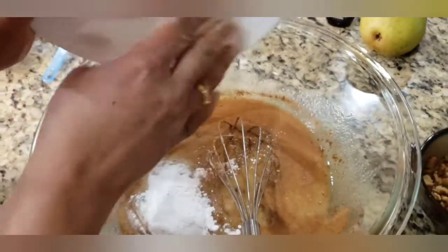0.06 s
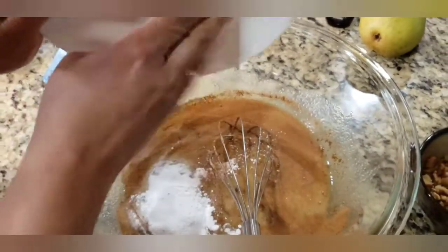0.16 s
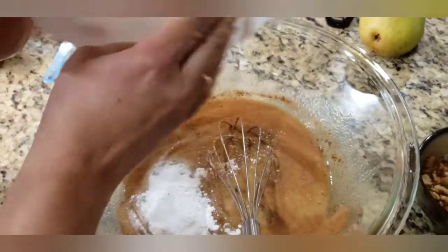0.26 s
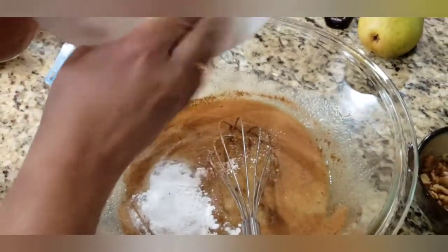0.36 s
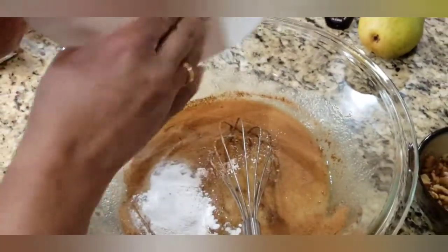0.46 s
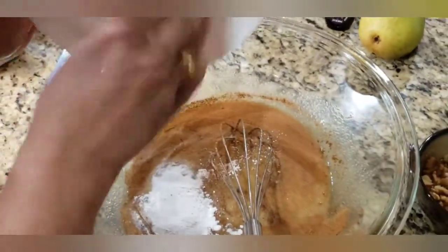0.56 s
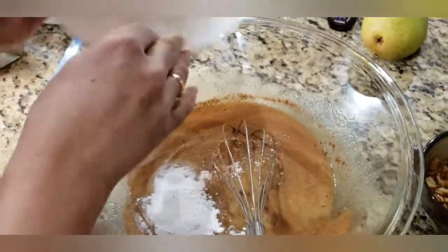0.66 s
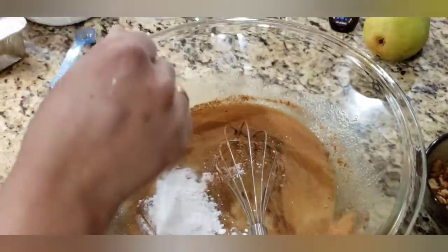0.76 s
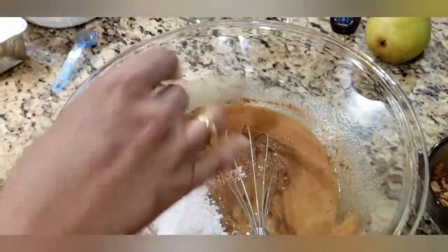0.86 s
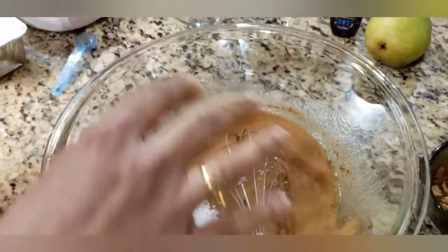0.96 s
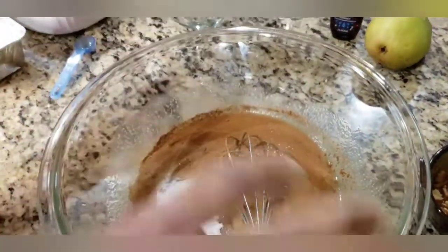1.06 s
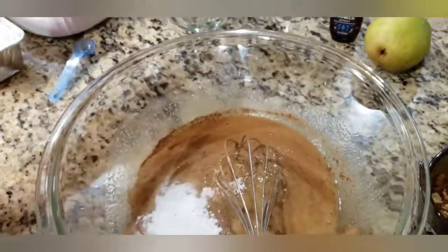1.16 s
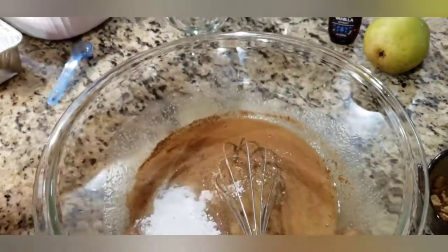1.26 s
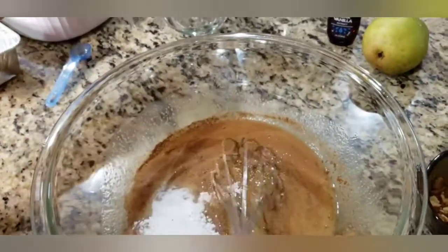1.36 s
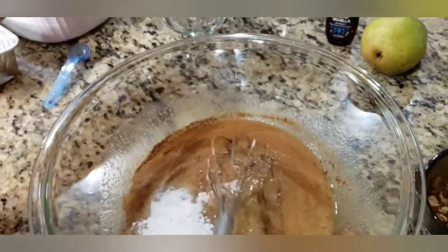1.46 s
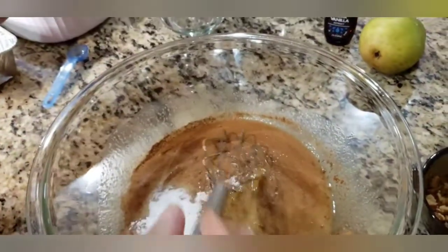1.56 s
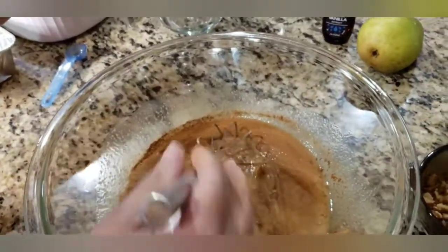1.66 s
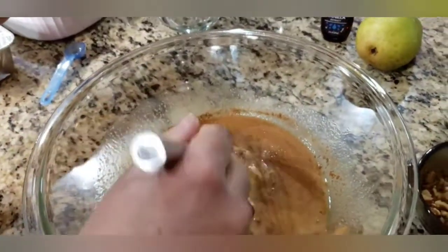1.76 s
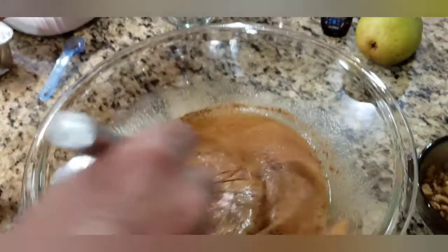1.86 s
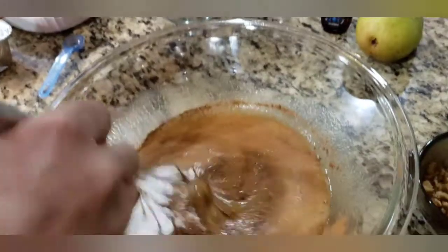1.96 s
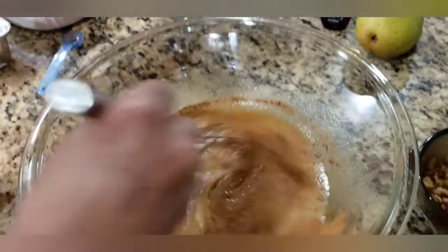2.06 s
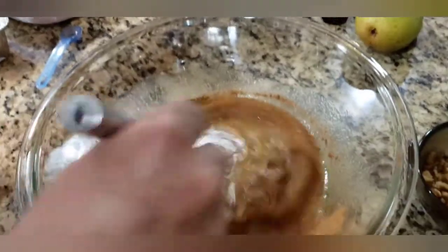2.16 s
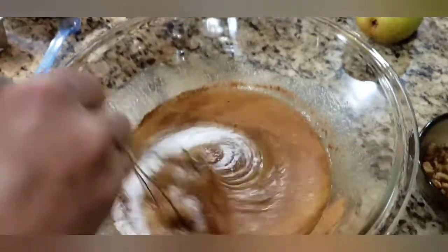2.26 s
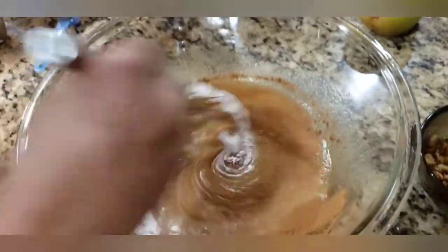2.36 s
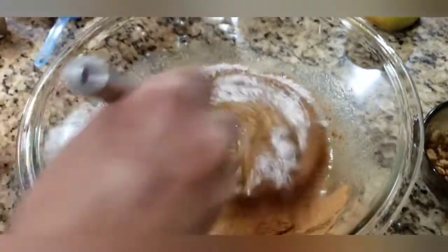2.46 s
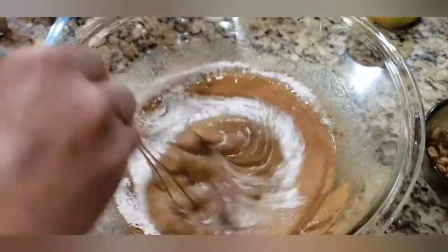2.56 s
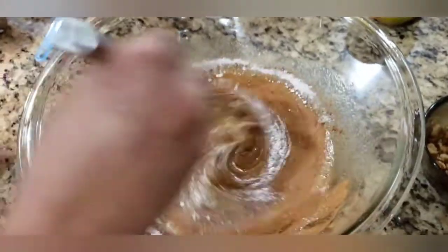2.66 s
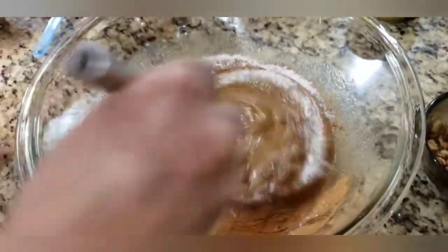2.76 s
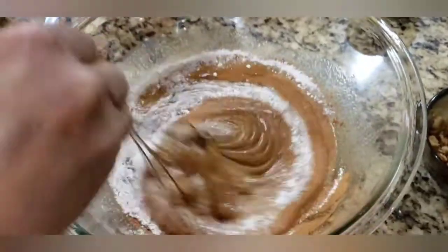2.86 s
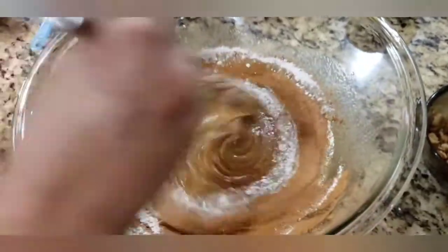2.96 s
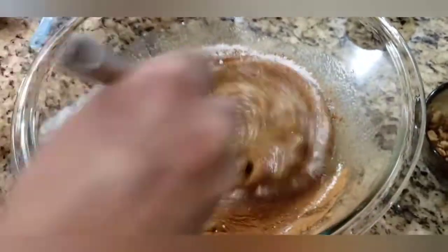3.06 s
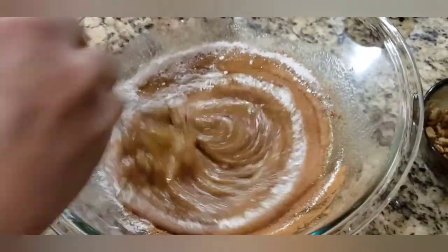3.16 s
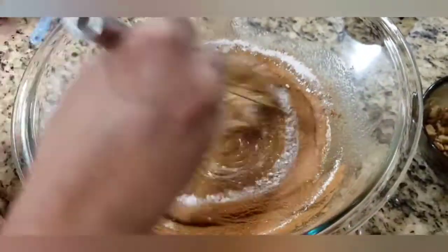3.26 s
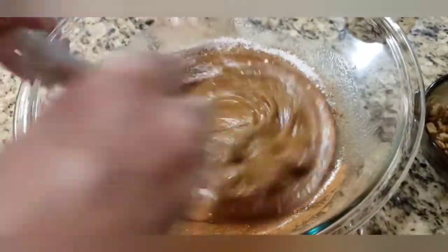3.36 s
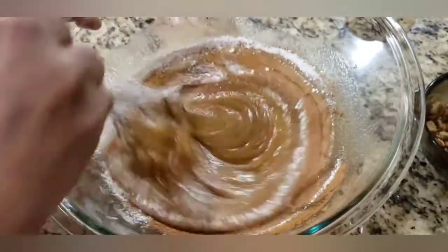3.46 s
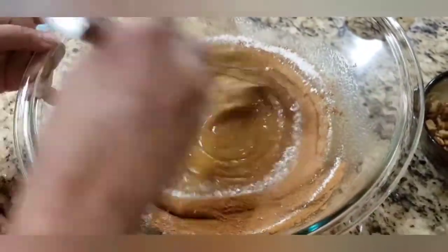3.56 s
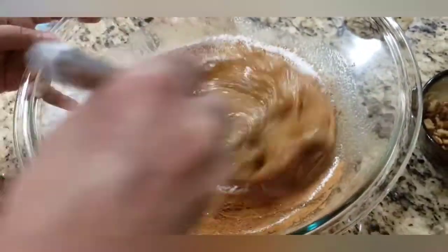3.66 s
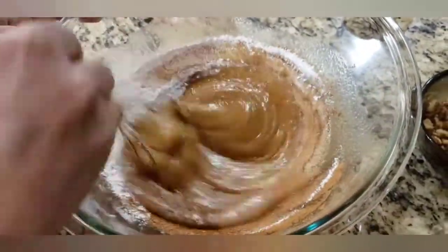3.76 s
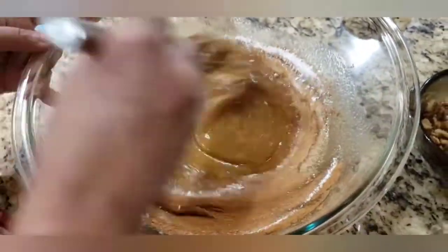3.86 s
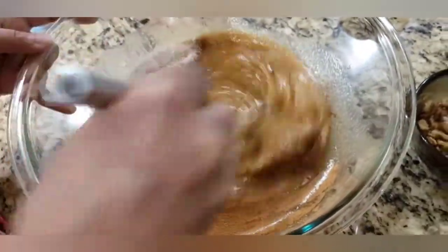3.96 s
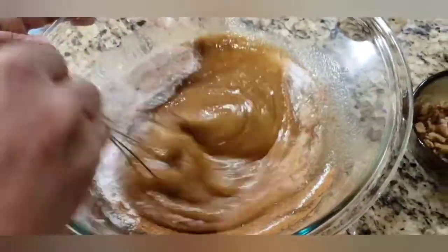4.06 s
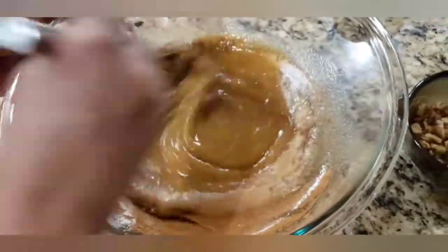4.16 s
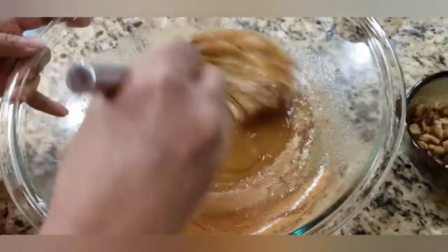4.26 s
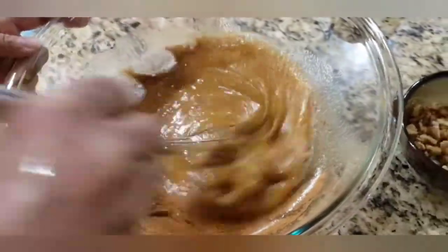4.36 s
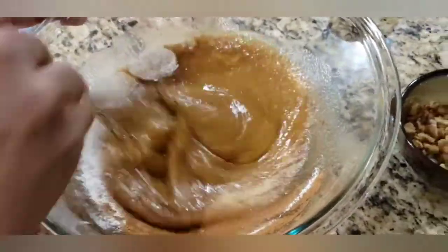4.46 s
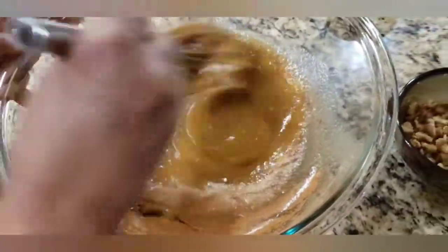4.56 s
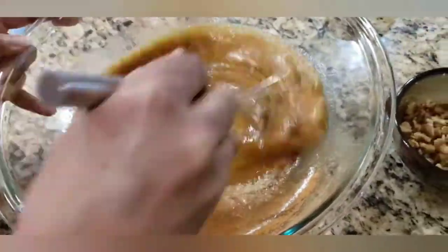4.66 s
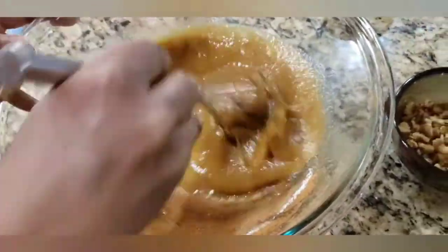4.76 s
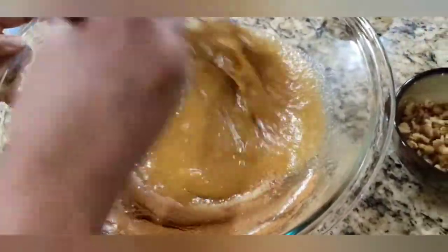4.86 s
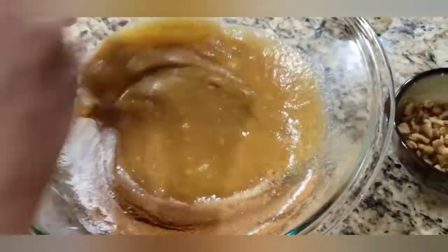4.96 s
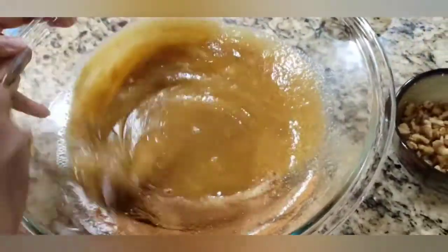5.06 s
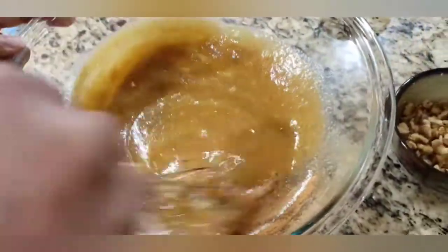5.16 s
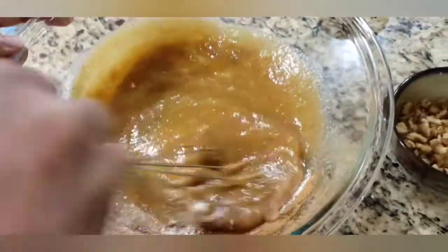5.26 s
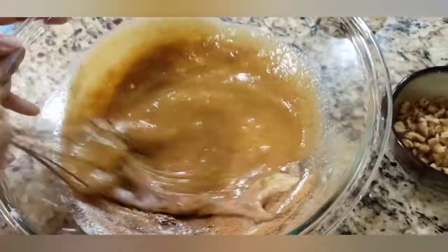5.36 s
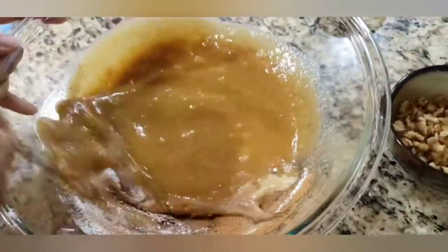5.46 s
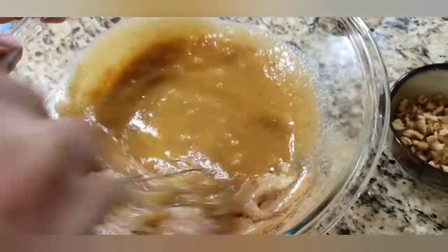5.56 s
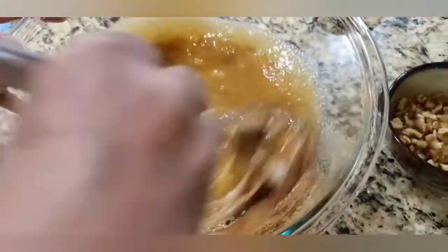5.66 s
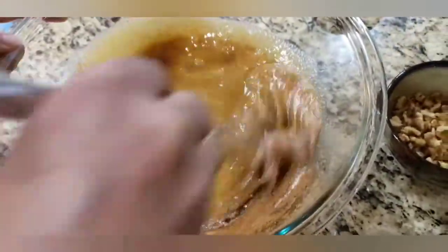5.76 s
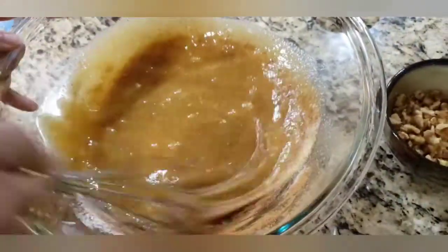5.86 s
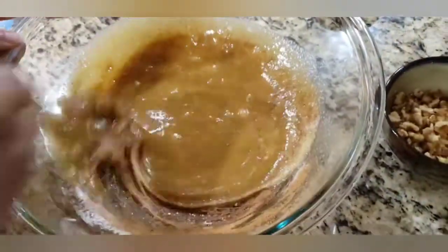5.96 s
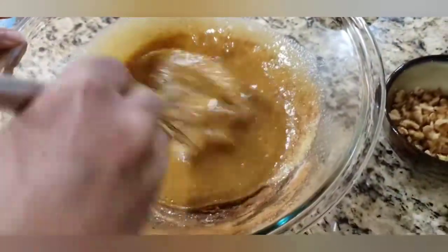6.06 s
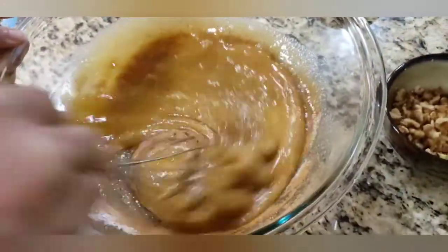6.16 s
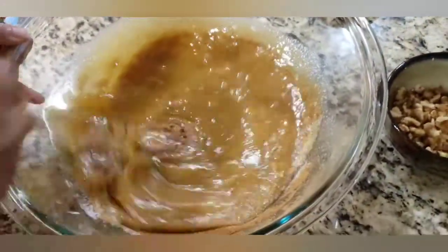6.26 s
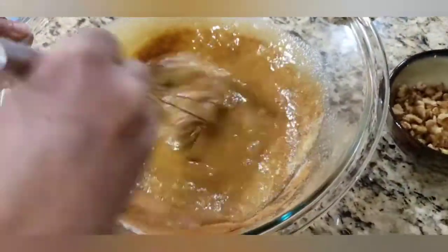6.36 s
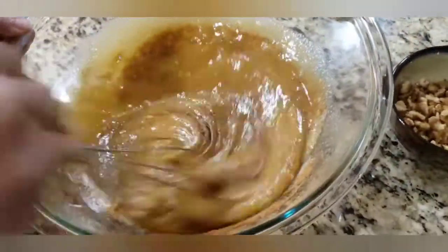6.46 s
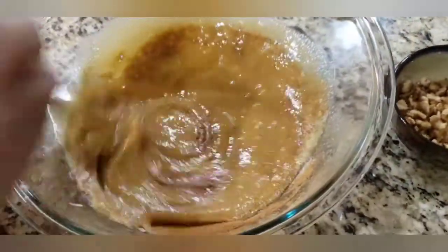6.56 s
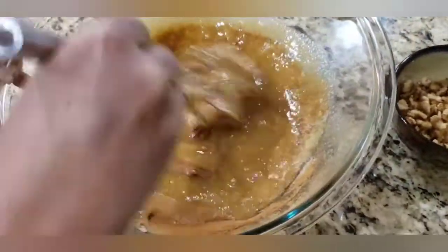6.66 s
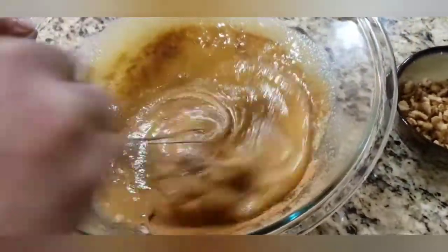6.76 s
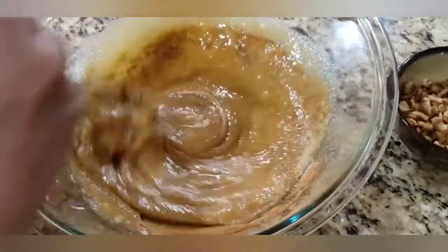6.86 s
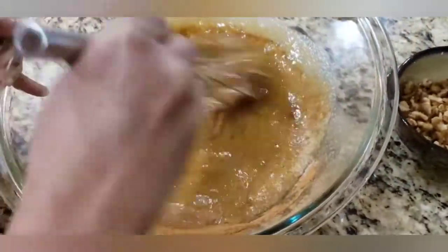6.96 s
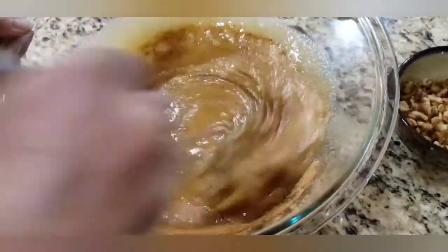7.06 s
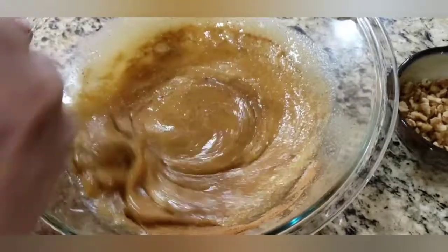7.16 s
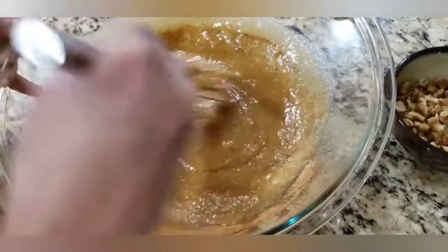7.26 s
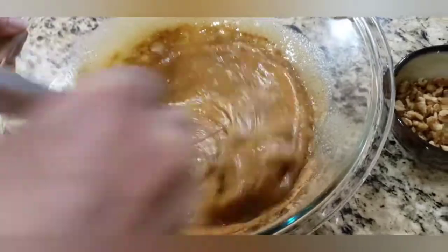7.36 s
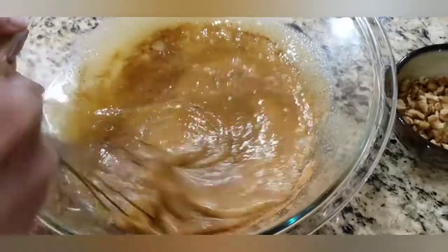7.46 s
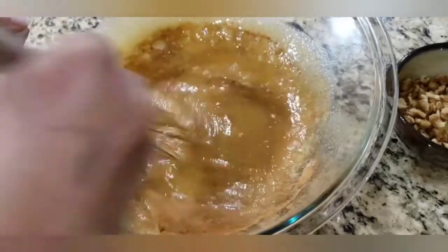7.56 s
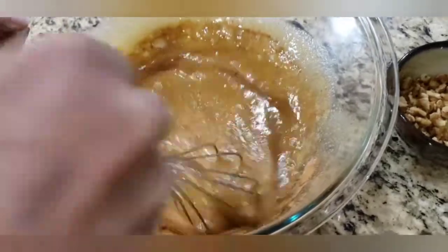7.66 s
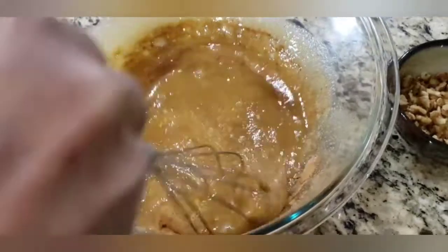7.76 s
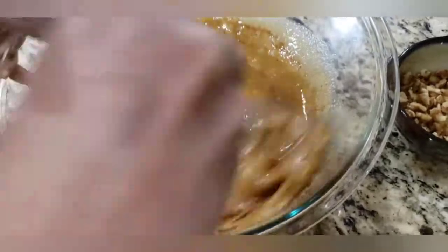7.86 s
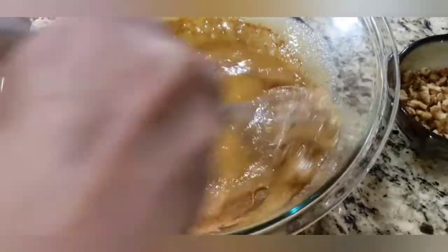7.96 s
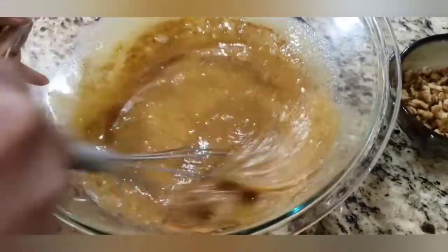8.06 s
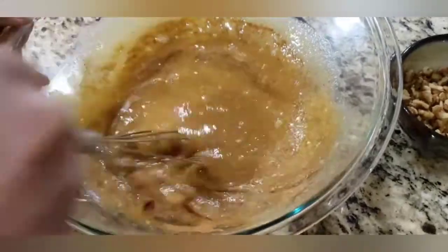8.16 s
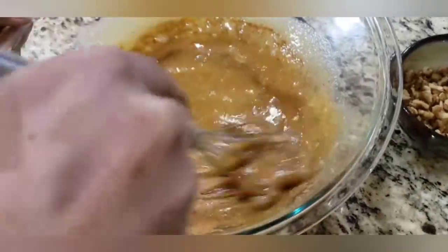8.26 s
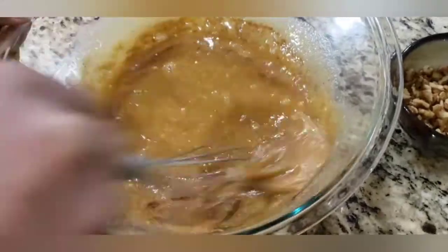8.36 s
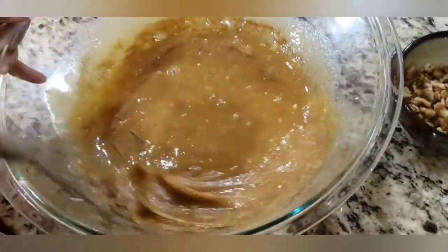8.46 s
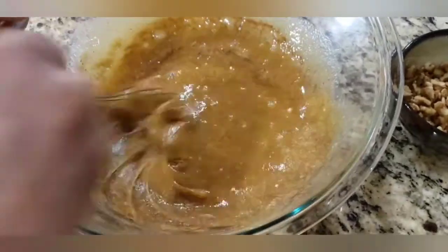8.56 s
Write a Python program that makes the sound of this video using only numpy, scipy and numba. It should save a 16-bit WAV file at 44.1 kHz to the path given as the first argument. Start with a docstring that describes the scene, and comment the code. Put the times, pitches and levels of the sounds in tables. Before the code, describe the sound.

A close stereo pickup in a small kitchen, with short reflections and a faint low appliance hum. From 0 to 0.9 s a small ceramic dish is tapped empty in light, dry knocks, strongest near 0.25, 0.46 and 0.66, with thin finger brushing. A quiet gap follows until about 1.6 s. At 1.73 the dish lands on stone with the loudest, bright clack and a glass jar's chime; more clatter comes at 2.0 to 2.2, with another jar ringing at 2.1. From about 2.3 a wire whisk beats thick batter in a glass bowl: rapid uneven ticks, sizzling scratches, wet gurgles and smacks. It is hardest and busiest around 3.9 to 4.6, with a dull bowl bump near 5.2 and a slightly sparser moment around 5.5. Strokes pick up again from 5.7, with a sharp clink at 7.0, then soften somewhat but continue scraping to the end at 8.6.

```python
"""A wire whisk beats thick batter in a glass bowl: noise bursts through resonances tick and sizzle as wire
on glass, chirped damped tones smack as batter, and filtered noise makes the bowl rumble and drag on stone.
Before that a small ceramic dish, a sum of decaying modes, is tapped empty over the bowl and set down on the
stone counter, where two glass jars chime in. Two ports of a phone close above hear it in a small kitchen
with a low appliance hum of shaped noise."""
import sys
import numpy as np
from scipy import signal
from scipy.fft import rfft, irfft
from scipy.io import wavfile
from scipy.ndimage import uniform_filter1d, map_coordinates
from numba import njit

SR = 44100
rng = np.random.default_rng(int(sys.argv[2]) if len(sys.argv) > 2 else 0)


def gain_from_db(level_db):
    """Convert decibel levels to linear amplitude factors (20 dB per decade)."""
    decades = np.asarray(level_db, float) / 20
    return 10 ** decades


def put_to_file(sound):
    """Save the sound as 16-bit audio at rate SR, in the file named by the first command-line argument."""
    columns = np.atleast_2d(sound).T  # one column per channel
    safe = np.clip(columns, -1, 1)
    whole_steps = np.round(safe * 32767)
    wavfile.write(sys.argv[1], SR, whole_steps.astype(np.int16))


N = 379701  # samples


def over_hz(table, size):
    """Spectral envelope: a table read at each transform bin, linear in log frequency."""
    hz, value = np.transpose(table)
    return np.interp(np.log(np.fft.rfftfreq(size, 1 / SR) + 1), np.log(hz), value)


def over_time(table):
    """Temporal envelope: each column of a table interpolated at every sample."""
    s, *columns = np.transpose(table)
    return [np.interp(np.arange(N) / SR, s, column) for column in columns]


def shaped(x, gain):
    """Linear filtering in the frequency domain: one gain per bin."""
    return irfft(rfft(x) * gain, N)


def unit(x):
    """Power normalisation: scale to rms 1."""
    return x / np.sqrt(np.mean(x ** 2))


def walk(rate):
    """Slow random modulation: levels held for 1 / rate s, smoothed twice, rms 1."""
    hold = int(SR / rate)
    steps = np.repeat(rng.standard_normal(N // hold + 1), hold)
    return unit(uniform_filter1d(uniform_filter1d(steps, hold), hold)[:N])


def grit(per_s, spread_db):
    """Shot noise: sparse random clicks, a few much larger than the rest, rms 1."""
    clicks = (rng.random(N) < per_s / SR) * rng.standard_normal(N)
    return unit(clicks * gain_from_db(spread_db * np.minimum(rng.exponential(size=N), 3.5)))


def impulses(s, db):
    """Ideal impact: one sample at each time."""
    out = np.zeros(N)
    out[(np.atleast_1d(s) * SR).astype(int)] = gain_from_db(db)
    return out


def resonance(x, hz, width_hz):
    """Damped oscillator: a two-pole resonance with gain 1 at the centre."""
    return signal.lfilter(*signal.iirpeak(hz, hz / width_hz, SR), x)


def ring(x, modes):
    """Modal superposition: a unit impulse starts each decaying mode at its own level."""
    out = np.zeros(N)
    for hz, db, t60 in modes:
        pole = np.exp((2j * np.pi * hz - np.log(1000) / t60) / SR)
        out += gain_from_db(db) * signal.lfilter([1], [1, -pole], x).imag
    return out


@njit
def sliding(x, hz, width_hz):
    """Time-varying oscillator: a resonance whose centre moves every sample, gain 1 at the centre."""
    y, band, low = np.empty(len(x)), 0., 0.
    for i in range(len(x)):
        g, damping = np.tan(np.pi * hz[i] / SR), width_hz / hz[i]
        v = (band + g * (x[i] + 1e-18 - low)) / (1 + g * (g + damping))
        band, low, y[i] = 2 * v - band, low + 2 * g * v, damping * v
    return y


def loose(x, hz, width_hz):
    """Load-dependent resonance: batter load and contact point shift its centre at random."""
    detune_share, detunes_per_s = .03, 18
    return sliding(x, hz * (1 + detune_share * walk(detunes_per_s)), 1. * width_hz)


def glide(x, share, rate):
    """Frequency modulation by playing x at a wandering speed: its resonances slide up and down."""
    return map_coordinates(x, [np.cumsum(1 + share * walk(rate))], order=1, mode="mirror")


def patchy(x, colour, rate):
    """Independent band modulation: overlapping bands of coloured x flicker apart."""
    flicker_db = 2
    octave = np.log2(np.fft.rfftfreq(N, 1 / SR) + 1)
    centres = np.log2([1500, 3000, 4500, 6500, 9000, 12000, 15500])
    gain = gain_from_db(over_hz(colour, N))
    return sum(shaped(x * gain_from_db(flicker_db * walk(rate)), np.interp(octave, centres, band) * gain)
               for band in np.eye(len(centres)))


def bursts(s, ms, gain, rise=0.057):
    """Rough contact: noise pressure peaks at s, builds faster than it fades; one gain row per output."""
    first_touch = 2
    out, t = np.zeros((len(gain), N + 4096)), (np.arange(4096) - 1024) / SR
    for k, noise in enumerate(rng.standard_normal((len(s), 4096))):
        noise[1024] = first_touch
        gritty = noise * np.sqrt(np.abs(noise))
        tau = np.where(t < 0, rise, .75) * max(ms[k], .2) / 1000
        at = int(s[k] * SR)
        out[:, at:at + len(t)] += gain[:, k, None] * gritty * np.exp(-np.abs(t) / tau)
    return out[:, 1024:N + 1024]


def pops(rows, decay_s, rise_s, glide, rough_db):
    """Transient oscillation: one damped, gliding tone per row (time [s], level [dB], frequency [Hz])."""
    out, t = np.zeros(N + 8192), np.arange(8192) / SR
    for (s, db, hz), tau in zip(rows, np.broadcast_to(decay_s, len(rows))):
        tone = np.sin(2 * np.pi * hz * t * (1 + glide * t)) * np.exp(-t / tau) * (1 - np.exp(-t / rise_s))
        out[int(s * SR):][:len(t)] += gain_from_db(db) * tone
    return out[:N] * gain_from_db(rough_db * walk(70))


def swell(s, db, rise_s, fade_s):
    """Exponential energy envelope: power builds up to each moment s and fades after it."""
    t = np.arange(-SR // 2, SR // 2 + 1) / SR
    shape = np.exp(-2 * np.abs(t) / np.where(t < 0, rise_s, fade_s))
    return np.abs(signal.fftconvolve(impulses(s, db) ** 2, shape, "same"))


# room tone spectrum, relative: (frequency [Hz], level [dB])
KITCHEN_SPECTRUM = [(18, -31), (30, -21), (59, 1.5), (95, -12.5), (131, 3.5), (170, -7.5), (266, -5.5),
                    (295, -4.5), (355, -12.5), (649, -28), (1430, -48), (1590, -50), (1720, -67),
                    (16000, -43)]
# its balance between the ports: (frequency [Hz], left minus right [dB])
KITCHEN_BALANCE = [(60, 2.5), (110, 1), (200, 3.5), (380, -1.5), (700, -6), (1290, 0), (2380, 11),
                   (4400, -57), (8120, 2), (15000, -26)]
# its likeness at the ports, clipped to 0-1 on use: (frequency [Hz], likeness [1])
KITCHEN_LIKENESS = [(60, 4), (130, 5), (290, -1), (640, 1), (15000, -7.5)]


def kitchen():
    """Diffuse-field noise: mid and side room tones whose ratio sets how alike the ports are."""
    level_db = -55
    alike = np.sqrt(np.clip(over_hz(KITCHEN_LIKENESS, N), 0, 1))
    colour = gain_from_db(over_hz(KITCHEN_SPECTRUM, N))
    mid, side = (shaped(rng.standard_normal(N) * gain_from_db(5.3 * walk(5.4)), colour * np.sqrt(1 + sign * alike))
                 for sign in (1, -1))
    half = gain_from_db(over_hz(KITCHEN_BALANCE, N) / 2)
    return gain_from_db(level_db) * unit(np.array([shaped(mid + side, half), shaped(mid - side, 1 / half)]))


def room(x, early_db, late_db):
    """Reverberation by convolution: close reflections from bowl and counter, then a duller tail."""
    early_t60_s, late_t60_s = 0.0091, 0.37
    alike_hz = 700  # below it both ports hear the same tail
    t = np.arange(SR // 2) / SR
    early, late = (rng.standard_normal((2, len(t))) * np.exp(-np.log(1000) * t / t60) * (t > .001)
                   for t60 in (early_t60_s, late_t60_s))
    late = signal.lfilter([1], [1, -.6], late)
    late = signal.lfilter(*signal.butter(1, 350, "high", fs=SR), late)  # the small kitchen holds little bass
    early = signal.lfilter(*signal.butter(2, alike_hz, "high", fs=SR), early)
    late = late - signal.lfilter(*signal.butter(1, alike_hz, fs=SR), late - late[0])
    shifting = x * np.tanh(3 * walk(25))  # moving hands keep changing the close paths
    out = 0
    for source, echo, db in ((shifting, early[:, :2048], early_db), (x, late, late_db)):
        echo = echo / np.linalg.norm(echo, axis=1, keepdims=True)
        out = out + gain_from_db(db) * signal.oaconvolve(source, echo, axes=1)[:, :N]
    return out


# balance between the two ports: (frequency [Hz], left minus right [dB])
PORT_BALANCE = [(60, -13.5), (110, -10), (200, -2.5), (380, 1.5), (700, -2.5), (1290, 2), (2380, 4),
                (4400, -8.5), (8120, -4.5), (15000, -7)]


def ports(x, moving):
    """Interaural-like differences: level and arrival differ; moving hands scatter treble between ports."""
    lag_ms, unlike_hz = 0.15, 1580  # the right port hears later; above unlike_hz the ports grow unlike
    hz = np.fft.rfftfreq(N, 1 / SR)
    turn = gain_from_db(over_hz(PORT_BALANCE, N) / 2) * np.exp(1j * np.pi * hz * lag_ms / 1000)
    treble = 0.93 * hz / np.hypot(hz, unlike_hz)
    delay = np.exp(-2j * np.pi * hz * 0.0004005)  # s
    own = shaped(x * np.tanh(2 * walk(moving)), treble * delay)
    return np.array([shaped(x + own, turn), shaped(x - own, 1 / turn)])


# blows on the dish, levels before each layer's trim:
# (time [s], ring level [dB], thud level [dB], clatter level [dB])
DISH_BLOWS = [(0.0586, -43, -50, -77), (0.2492, -37.5, -36, -55), (0.306, -47.5, -70, -78),
              (0.4606, -31.5, -34.5, -43.5), (0.4734, -36.5, -68, -65), (0.665, -56, -32, -52),
              (0.738, -50.5, -80, -84), (0.7962, -46, -61, -68), (0.861, -46, -53, -77),
              (1.726, -14.5, -42, -19), (1.979, -28.5, -55, -31.5), (2.0038, -40, -58, -27.5),
              (2.108, -19.5, -49, -19), (2.179, -23, -59, -27)]
# modes of the dish: (frequency [Hz], level [dB], t60 [s])
DISH_MODES = [(1608, -2, .07), (1627, -8, .1), (2807, -3, .13), (2828, 1, .07), (4380, 3.5, .035),
              (5440, -7, .04), (6680, -4, .04)]
# nudges, one for each of two glass jars: (time [s], level [dB])
JAR_NUDGES = [(1.725, -32.5), (2.108, -23.5)]
# modes of each jar, one list a jar: (frequency [Hz], level [dB], t60 [s])
JAR_MODES = [
    [(3256, -3, .32), (3602, -12, 1.1), (4436, -10, .3), (5158, 0, .21), (5297, -10, .25), (6365, -4, .25),
     (7257, -20, .3)],
    [(1405, -23, .35), (2847, -16, .3), (2913, -15, .55), (4415, -13, .3), (4468, -4, .15), (4570, -18, .4),
     (5050, -14, .12), (5470, -2, .16), (6700, -10, .06)],
]


def dish():
    """Modal vibration: each blow rings the dish over a one-swing thud and a clatter; the jars chime in."""
    s, ring_db, thud_db, clatter_db = np.transpose(DISH_BLOWS)
    rings = gain_from_db(1.24 * walk(50.65)) * ring(impulses(s, ring_db - 9.5), DISH_MODES)
    jars = sum(ring(impulses(*nudge), modes) for nudge, modes in zip(JAR_NUDGES, JAR_MODES))
    jars = gain_from_db(3.6 * walk(60.17)) * jars
    # a negative frequency starts the swing downwards
    thud = pops(np.c_[s - .002, thud_db + 19, np.full(len(s), -225.)], 0.0018, 0.0014, 0, 0)
    clatter = bursts(s + 0.00252, np.full(len(s), 5.), gain_from_db([clatter_db + 11.0]))[0]
    return rings + jars + thud + resonance(resonance(clatter, 700, 1630), 910, 1900)


# handling and stirring: (time [s], batter level [dB], bowl drag on stone [dB], rumble level [dB])
STIRRING = [(0.0, -77, -84, -57), (1.03, -71.5, -64.5, -69), (1.65, -89, -73, -54.5), (1.92, -54, -71, -60),
            (2.23, -52, -52.5, -65), (2.64, -64, -66, -55.5), (3.14, -70.5, -66, -65.5),
            (4.82, -59, -58, -50), (5.49, -66, -59, -57.5), (7.19, -62.5, -60, -59.5),
            (7.6, -70, -60.5, -60), (8.61, -61, -58.5, -64)]
# low knocks, the first a tap on the held dish, the rest dish and bowl on the stone:
# (time [s], level [dB], frequency [Hz], decay [s])
LOW_KNOCKS = [(0.663, -30, 974, 0.0024), (1.98, -26, 498.5, 0.049), (2.008, -26, 504, 0.026),
              (2.108, -11.5, 435, 0.0093), (2.179, -23, 419.3, 0.036), (2.235, -24, 422.3, 0.018),
              (2.264, -31.5, 401, 0.017), (2.431, -24.5, 370, 0.0036), (3.664, -37, 307, 0.023),
              (4.311, -37, 291, 0.027), (3.701, -46, 368, 0.02), (4.256, -43, 243, 0.011),
              (4.331, -41, 398, 0.015), (4.469, -40.5, 337, 0.015), (4.813, -41.5, 388, 0.038),
              (4.884, -36.5, 369, 0.026), (5.179, -17.5, 221, 0.0019), (5.762, -35.5, 341, 0.016),
              (5.944, -41, 328, 0.046), (5.272, -42.5, 483, 0.011), (6.396, -49, 296, 0.018),
              (6.744, -44.5, 396, 0.016), (6.805, -44.5, 285, 0.018), (6.883, -41, 524, 0.011),
              (7.004, -45, 368, 0.017), (7.083, -43, 467, 0.017), (7.261, -46, 397, 0.014),
              (7.413, -48, 305, 0.025), (7.537, -43, 415, 0.014), (8.087, -43.5, 338, 0.073),
              (8.491, -45.5, 367, 0.023)]
# bumps of the bowl on the counter: (time [s], level [dB], frequency [Hz])
BOWL_BUMPS = [(2.699, -40, 123), (4.844, -30, 57.6), (5.175, -32.5, 69), (5.211, -35, 85)]


def stir():
    """Friction and cavity resonance: batter gurgles in drifting pockets, the bowl drags, low knocks sound."""
    batter_db, drag_db, rumble_db = over_time(STIRRING)
    pockets = np.zeros(N)
    for hz in (640, 865, 1020, 1195):
        pocket = glide(resonance(grit(900, 1.0), hz, 110), .06, 8)  # share of pitch, turns per s
        pockets += gain_from_db(3 * walk(20)) * pocket
    drag = sum(gain_from_db(5.3 * walk(12)) * resonance(rng.standard_normal(N), hz, 51)
               for hz in (268, 333, 375.6, 469.0))
    rumble = sum(gain_from_db(3 * walk(12)) * resonance(rng.standard_normal(N), hz, width)
                 for hz, width in ((57, 21), (128, 29.6)))
    # each contact sets the batter moving; the dish skids on after each clatter
    s, tick_db, _, body_db = np.transpose(CONTACTS)
    slosh = swell(s, tick_db + body_db - 14, rise_s=0.0029, fade_s=0.023)
    skid = swell(*np.transpose(DISH_BLOWS)[[0, 3]], rise_s=0.003, fade_s=0.092)
    skid_db, skid_low_db = -20, -22  # relative to the clatter column, in the middle and the low band
    scuff = gain_from_db(skid_db) * np.sqrt(skid) * unit(resonance(grit(790, 1.28), 1220, 1500))
    middle = np.sqrt(gain_from_db(batter_db) ** 2 + slosh)
    low = np.sqrt(gain_from_db(drag_db) ** 2 + gain_from_db(3.0) ** 2 * slosh + gain_from_db(skid_low_db) ** 2 * skid)
    layers = scuff + middle * unit(pockets) + low * unit(drag) + gain_from_db(rumble_db) * unit(rumble)
    rows = np.array(LOW_KNOCKS)
    knocks = pops(rows[:, :3], rows[:, 3], 0.00091, -0.066, 0.96)
    return layers + knocks + pops(BOWL_BUMPS, 0.012, 0.00026, 0, 0)


# rubbing: (time [s], scratch level [dB])
RUBBING = [(0.0, -67.5), (0.53, -82), (0.72, -72), (0.96, -62), (1.29, -74), (1.6, -68), (1.89, -52),
           (2.18, -55.5), (2.85, -55), (3.04, -55), (3.38, -59), (4.12, -51), (5.04, -62.5), (5.56, -60),
           (5.99, -53.5), (6.47, -55), (6.81, -57.5), (7.24, -52), (7.77, -61.5), (8.61, -53.5)]
# spectrum of the scratch, relative: (frequency [Hz], level [dB])
SCRATCH_SPECTRUM = [(880, -5), (1500, -43), (2250, -26.5), (3000, 5), (3920, -9), (5660, 2.5), (6630, -0.5),
                    (9100, -3.5), (11000, 3), (12700, 4), (14200, -1.5), (16000, 1.5)]
# longer sweeps of finger or wires along a surface: (time [s], scratch level [dB], rise [s], fade [s])
LONG_SWEEPS = [(0.8, -51, 0.03, 0.037), (0.869, -54, 0.0059, 0.023), (4.331, -36, 0.0075, 0.028),
               (5.0, -45, 0.048, 0.056), (7.09, -35.5, 0.0082, 0.011), (8.46, -39, 0.026, 0.029)]


def rub():
    """Stick-slip friction: scratch hiss whose bands flicker apart, with small ticks ringing glass and bowl."""
    dish_down_s, finger_from_hz = 1.72, 4200  # until the dish lands only fingers brush, a thinner hiss
    catch_db = 2.0 * walk(40) + 0.8 * walk(190)
    grains = grit(700, 2.9) * 1.04 + rng.standard_normal(N)
    hiss = patchy(grains * gain_from_db(catch_db), SCRATCH_SPECTRUM, 13)
    thinner = signal.lfilter(*signal.butter(4, finger_from_hz, "high", fs=SR), hiss)
    hiss = np.where(np.arange(N) < dish_down_s * SR, thinner, hiss)
    ticks = grit(90, 1.9)
    rattle = sum(gain_from_db(db + 4 * walk(50)) * loose(ticks, hz, 0.32 * width)
                 for hz, width, db in GLASS_RESONANCES + BODY_RESONANCES)
    # each contact drags a scrape with it
    s, tick_db, sizzle_db = np.transpose(CONTACTS)[:3]
    scrape = swell(s, tick_db + sizzle_db - 15, rise_s=0.0046, fade_s=0.017)
    scrape = scrape + sum(swell(*row) for row in LONG_SWEEPS)
    level = np.sqrt(gain_from_db(over_time(RUBBING)[0]) ** 2 + scrape)
    return level * (unit(hiss) + gain_from_db(-13.0) * unit(rattle))


def grazes():
    """Random point process: light contacts as strong as the rubbing just then; columns as the contacts."""
    beating_from_s, per_s = 2.3, 36
    span_s = N / SR - beating_from_s
    when, size, sizzle, body = rng.random((int(per_s * span_s), 4)).T
    s = beating_from_s + when * ((N - 1) / SR - beating_from_s)
    db = np.interp(s, *np.transpose(RUBBING)) + 4.5 - 3 * np.log(1 - .97 * size)
    return np.c_[s, db, -7 + 12 * (sizzle - .5), -9.5 + 16 * (body - .5)]


# batter pockets closing: (time [s], level [dB], frequency [Hz])
POCKET_CLOSINGS = [(3.507, -48, 820), (4.217, -42.5, 930), (4.311, -44, 1030), (4.466, -40.5, 886),
                   (4.535, -37, 887), (4.57, -39, 915), (4.874, -41.5, 950), (5.333, -44, 700),
                   (5.752, -41, 691), (5.917, -42.5, 1180), (6.191, -38, 1196), (6.809, -42, 640),
                   (6.889, -47, 1280), (7.003, -32, 916), (7.154, -41.5, 1224), (7.546, -41, 750),
                   (7.782, -42, 1017), (7.871, -40.5, 1074), (7.975, -40, 1046), (8.296, -40.5, 607),
                   (8.447, -41.5, 1040)]


def smacks():
    """Cavity collapse: each pocket closes with three weaker neighbours, a little later, at other pitches."""
    trail_s, pitch_share = .025, .12
    rows = np.repeat(POCKET_CLOSINGS, 4, axis=0)
    neighbour = np.arange(len(rows)) % 4 > 0
    late, size, pitch = rng.random((len(rows), 3)).T * neighbour
    rows = rows + np.c_[trail_s * late, -16 * size, rows[:, 2] * pitch_share * np.sin(2 * np.pi * pitch)]
    return pops(rows, decay_s=.008, rise_s=0.0011, glide=0.47, rough_db=2.6)


# hard contacts, mostly wire on glass, levels before each layer's trim:
# (time [s], tick level [dB], sizzle above tick [dB], body above tick [dB])
CONTACTS = [(0.016, -49, -8, -28), (0.032, -39, -2, -17), (0.046, -48, 2, -24), (0.0584, -36, -5.5, -37),
            (0.2471, -29, -7, -42), (0.308, -49, -6, -20), (0.4615, -26.5, -6, -39),
            (0.47, -33.5, 0.5, -18), (0.523, -53, 3, -20), (0.664, -41.5, 1.5, -54), (0.737, -52, 10, -25),
            (0.8607, -60, 16.5, -17), (1.621, -51, -1, 1), (1.727, -10.5, -9, -7.5), (1.9768, -30.5, 5, 3),
            (2.0662, -36, -4, -23.5), (2.1123, -17, -35, -18), (2.094, -45, -3, -20),
            (2.3445, -35, -5.5, -6), (2.398, -32.5, -11, -21), (2.432, -43, -10, 8),
            (2.4081, -26, -14, -5.5), (2.5037, -45, 5.5, 1), (2.594, -42, 0, -9), (2.614, -34.5, -6, -17),
            (2.638, -50, 10, -15), (2.684, -34, -6, -9), (2.882, -39.5, -2, -6.5), (2.892, -31, -2.5, -18),
            (2.9136, -36, -6, -12.5), (3.018, -33, -11, -34), (3.1033, -38.5, 2, -1.5),
            (3.177, -30.5, -4, -18), (3.204, -41, 1, -15), (3.25, -30.5, -3, -12.5),
            (3.5054, -31.5, 1.5, -9.5), (3.5554, -26.5, -10, -15), (3.6597, -23.5, 2.5, -21.5),
            (3.6961, -41.5, 7, -5), (3.749, -28, -8, -19), (3.855, -39.5, 0, -7.5), (3.901, -56, -6, -22),
            (3.9196, -20.5, -21, -22), (3.9288, -15.5, -15, -44), (3.9757, -28.5, 3, -14),
            (4.008, -38, -2, -16), (4.026, -26, -9, -18), (4.0504, -34.5, -3, -7.5),
            (4.1337, -40.5, 4, -21), (4.162, -37, 6, -37), (4.21, -20, -8, -19), (4.272, -32.5, 2.5, -8.5),
            (4.29, -46, 4, -24), (4.3064, -25.5, 8, -15), (4.342, -19, -5.5, -14),
            (4.4593, -28, 2.5, -12.5), (4.4911, -32.5, -2, -10), (4.5288, -21, -7, -19),
            (4.57, -20.5, -5, -30), (4.605, -26.5, 2, -29), (4.628, -39.5, 8, -9), (4.662, -43, 6, -20),
            (4.6748, -39, 6.5, -9), (4.73, -45, 6.5, -20), (4.84, -34, 3, -11), (4.869, -38, 10, -10),
            (4.8762, -23.5, 4, -11), (4.9237, -46, 12.5, -21), (4.965, -32.5, 6, -9), (4.982, -28, 5, -10),
            (5.008, -46, 9, -25), (5.0484, -40, 11, -30), (5.131, -49.5, 6.5, -20), (5.18, -39.5, 8, -12),
            (5.2197, -44, 0, -24), (5.244, -40.5, 9, -10), (5.3334, -42.5, -4, -4), (5.3827, -49, 7.5, -25),
            (5.403, -47, 6, -6), (5.714, -48, 8, -0.5), (5.7266, -44.5, 11.5, -7),
            (5.7513, -23.5, -9, -8.5), (5.7817, -42.5, 4, -7), (5.923, -31.5, -2, -10.5),
            (5.9442, -36, 2, -2), (5.9844, -25.5, -2.5, -8.5), (6.085, -29, -4, -33),
            (6.0974, -29, -0.5, -18.5), (6.1922, -35.5, -10, -3.5), (6.2401, -39, 2, -1),
            (6.3753, -53, -2, -25), (6.3924, -24.5, -12, -11), (6.4694, -32.5, -0.5, -16),
            (6.5642, -34.5, -17, -3), (6.6548, -26.5, -5, -13), (6.69, -31, -25, -39),
            (6.7158, -42, -5, -26), (6.7517, -37, -3, -8.5), (6.8057, -23.5, -11.5, -11),
            (6.829, -41, -2, -13), (6.844, -43, 5, -21), (6.887, -30.5, 2.5, -2.5), (6.9492, -27, -12, -20),
            (6.9803, -45, -2, -26), (7, -18, -20, -20.5), (7.01, -24, -21, -10.5), (7.077, -30, -3, -8.5),
            (7.098, -31.5, -1, -6), (7.154, -24.5, -9, -14.5), (7.191, -37.5, 0, -1), (7.229, -40, 8.5, -1),
            (7.3104, -26, -16, -31), (7.3537, -26, -21, -27), (7.414, -39, -17, -4),
            (7.4284, -34, -13, -4.5), (7.544, -37, 4, -2.5), (7.646, -35, -1, -11), (7.735, -45.5, 4, -17),
            (7.7864, -46, 2.5, -20), (7.87, -37.5, 4.5, -48), (7.9109, -35.5, -4, -16),
            (7.941, -39.5, 7.5, -13), (7.9705, -37.5, 2, -14), (8.071, -41.5, -5, -0.5),
            (8.1075, -40.5, 5, -3), (8.246, -35.5, -4, -10), (8.296, -39.5, 2.5, -4.5),
            (8.3318, -37.5, 1, -8), (8.359, -51, -6, -13), (8.587, -36.5, -13, -11), (8.558, -45, -15, -21)]
# resonances of the batter-damped glass: (frequency [Hz], width [Hz], level [dB])
GLASS_RESONANCES = [(4740, 160, -15), (5330, 250, -15), (5527, 310, -9.5), (5800, 147, -9.5),
                    (6460, 145, -11), (6860, 120, -15)]
# resonances of the bowl body: (frequency [Hz], width [Hz], level [dB])
BODY_RESONANCES = [(1895, 300, -12), (2700, 260, -7), (3050, 260, -2), (3445, 260, -8)]
# spectral gain of the sizzle: (frequency [Hz], gain [dB])
SIZZLE_SPECTRUM = [(4410, -63), (6500, -30), (7690, -15), (9570, -12), (10600, -13), (12900, -3.5),
                   (16000, -25)]
# resonances of the wires, before a common trim: (frequency [Hz], width [Hz], level [dB])
WIRE_RESONANCES = [(8140, 330, 11), (10900, 80, 16), (12100, 300, 9), (13500, 240, -12)]


def whisk():
    """Impact excitation: wires tick on damped glass, each with its own mix of modes; the batter smacks."""
    s, tick_db, sizzle_db, body_db = np.r_[CONTACTS, grazes()].T
    ms = np.clip(1.6 - 4.4 * (tick_db + 31.5), 1.8, 4.2)  # harder contacts are briefer
    modes = GLASS_RESONANCES + BODY_RESONANCES
    mix_db = rng.uniform(-5, 5, (len(s), len(modes))).T
    mix_db[len(GLASS_RESONANCES):] += body_db + 0.5
    contacts = bursts(s, ms, gain_from_db(tick_db + 12 + mix_db))
    ticks = sum(gain_from_db(db) * loose(x, hz, width) for x, (hz, width, db) in zip(contacts, modes))
    sizzle = bursts(s, ms, gain_from_db([tick_db + sizzle_db + 6]), rise=0.28)[0]
    sizzle = patchy(sizzle, SIZZLE_SPECTRUM, 28)
    wires = sum(gain_from_db(db + 3.5 * walk(42) - 7.5) * resonance(sizzle, hz, width)
                for hz, width, db in WIRE_RESONANCES)
    # batter thrown by the same contact
    slap = resonance(bursts(s, 4.2 * ms, gain_from_db([tick_db + body_db]))[0], 930, 300)
    # bare broadband click at first touch
    click_db = tick_db + np.maximum(sizzle_db, 0) - 9
    click = bursts(s, np.full(len(s), .7), gain_from_db([click_db]))[0]
    click = signal.lfilter(*signal.butter(2, 1500, "high", fs=SR), click)
    return click + ticks + sizzle + wires + slap + smacks()


# the whisk wanders across the bowl: (time [s], left minus right [dB])
WHISK_WANDER = [(0, -6.5), (2.3, -3), (2.8, -4), (3.75, -4), (4.7, -1), (5.3, -0.5), (5.8, 1.5), (6.8, 0),
                (7.3, 0.5), (7.8, 0), (8.61, 5.5)]


def scene():
    """Superposition of direct and reverberant sound: the dish wakes more of the room than the whisk."""
    far = ports(dish(), moving=24.85)
    side_db = over_time(WHISK_WANDER)[0] * np.array([[.5], [-.5]])
    near = ports(whisk() + rub(), moving=60.) * gain_from_db(side_db) + ports(stir(), moving=60.)
    far = far + room(far, early_db=-5, late_db=-9)
    near = near + room(near, early_db=-5, late_db=-11.5)
    return far + near + kitchen()


def low_pass(x):
    """Removes everything above the highest recorded frequency."""
    return signal.sosfilt(signal.butter(12, 17140, fs=SR, output="sos"), x)


def record(dry):
    """Band limiting: the phone cuts the lowest bass and the top."""
    bass_cut = signal.butter(5, 46, "high", fs=SR, output="sos")
    top_cut = signal.ellip(8, .2, 60, 15900, fs=SR, output="sos")
    mix = signal.sosfilt(np.r_[bass_cut, top_cut], dry)
    return low_pass(mix)


dry = scene()
out = record(dry)
put_to_file(out)
```